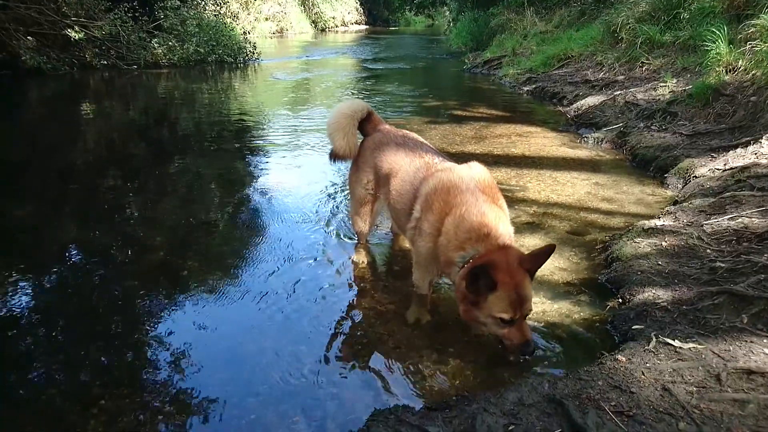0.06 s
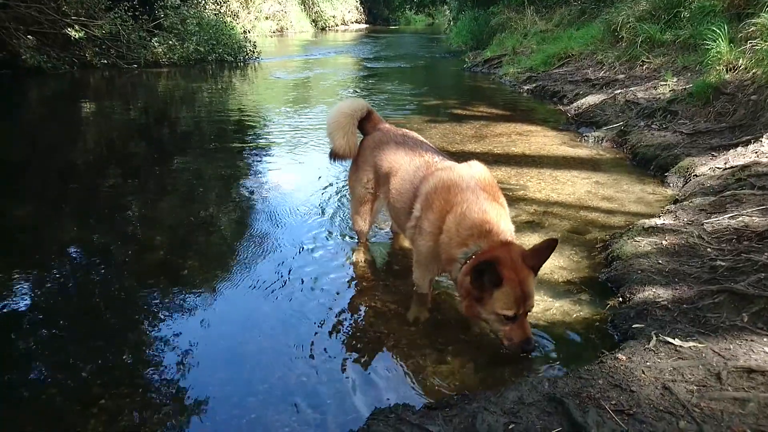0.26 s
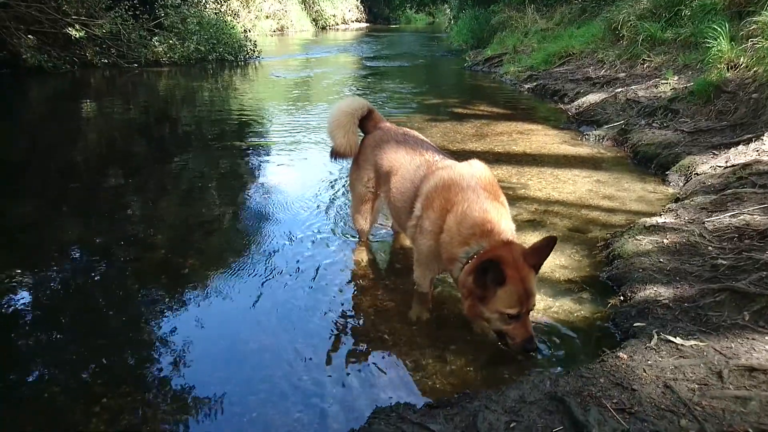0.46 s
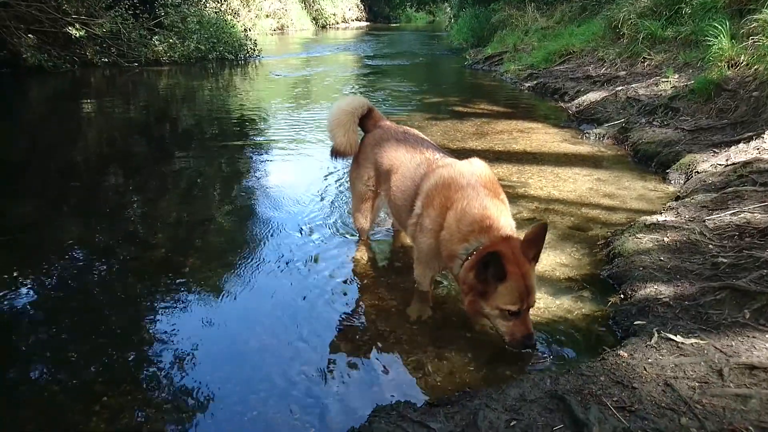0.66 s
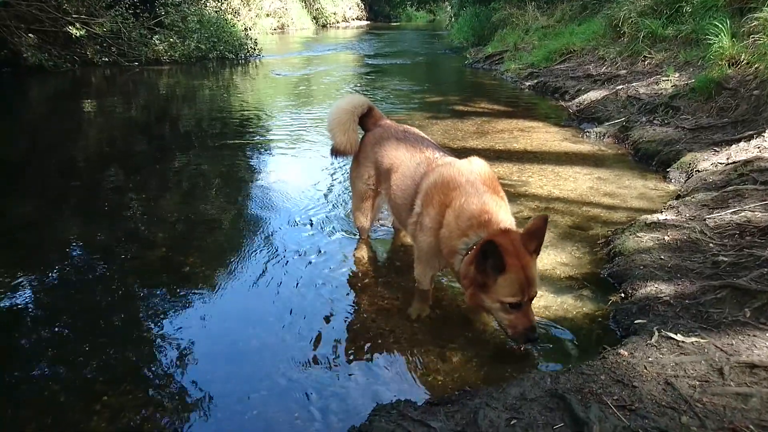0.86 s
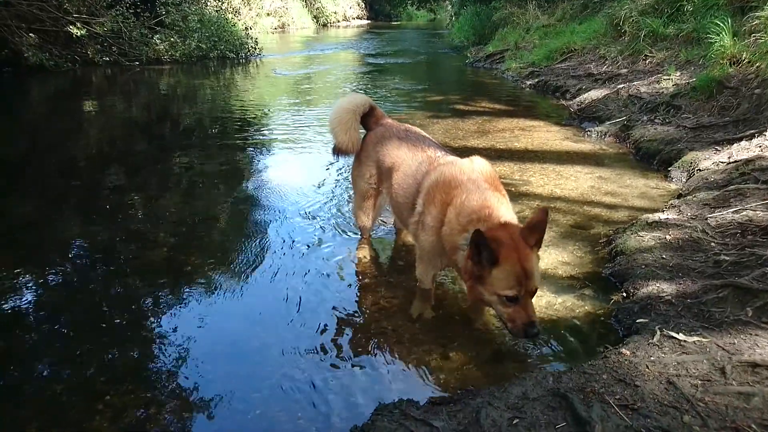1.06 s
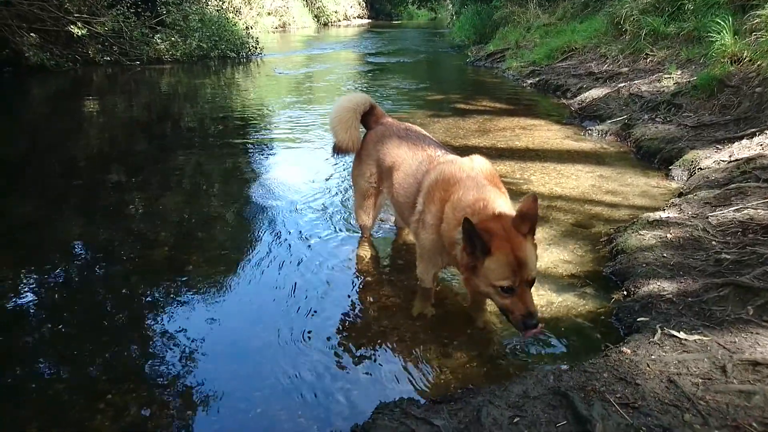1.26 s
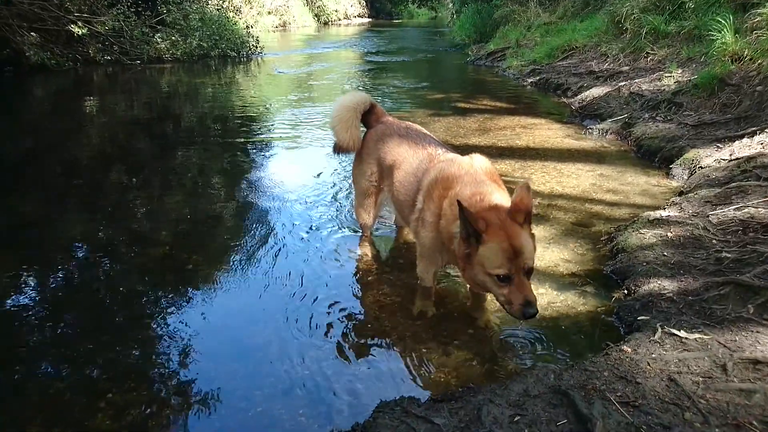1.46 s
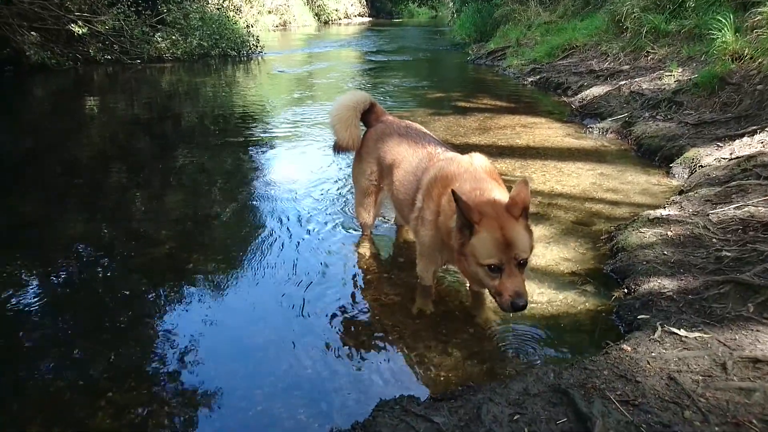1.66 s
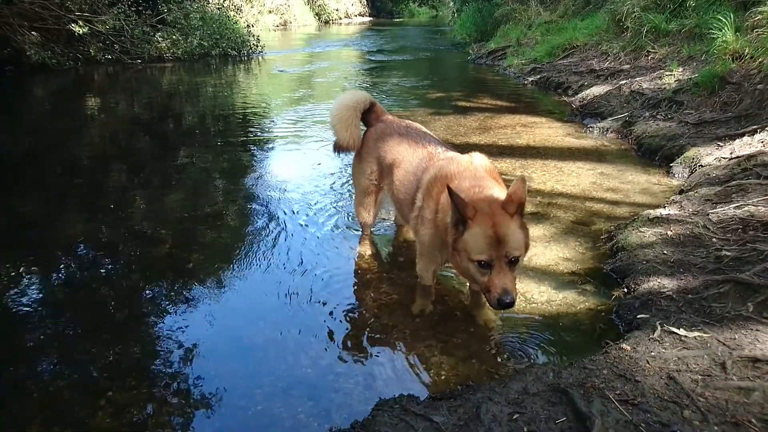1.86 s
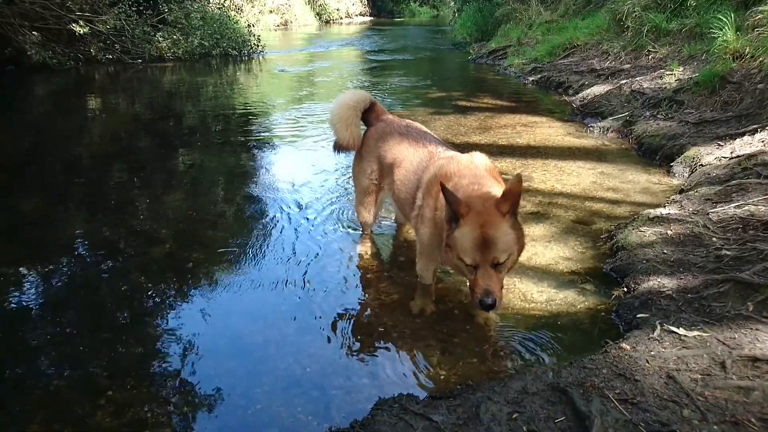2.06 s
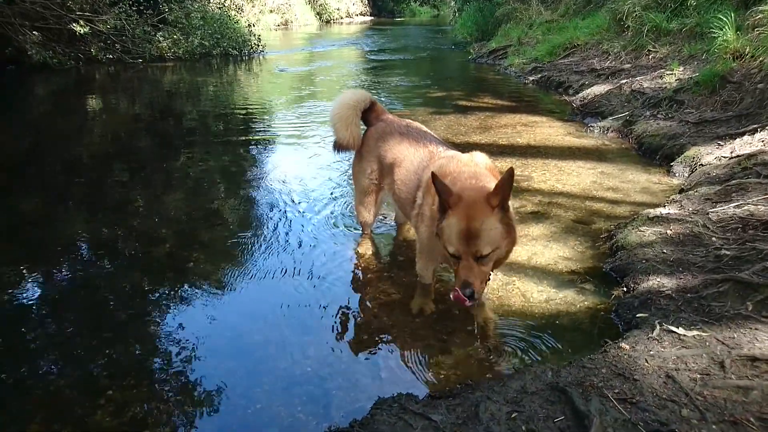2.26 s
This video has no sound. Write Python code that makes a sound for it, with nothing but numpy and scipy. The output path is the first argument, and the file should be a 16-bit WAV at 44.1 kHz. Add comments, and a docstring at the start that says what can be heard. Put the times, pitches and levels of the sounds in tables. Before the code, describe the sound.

A dog laps softly at a river on the left, with a few bubbles around 0.6 seconds, then small wet lip clicks until 2.4. Louder, low hand bumps hit the microphone on the right through 1.3 seconds and again at 2.1, with a faint sliding hiss early on. Light wind gusts near 1.1 and 1.9. From 0.3, a distant bird whistles on the left over faint water and leaves.

```python
"""A hand bumps and slides on the camera body while light wind buffets the right microphone port.
Off to the left a dog laps at a shallow river, then licks its lips: small wet clicks, a few bubbles.
Further left a songbird whistles from the trees, and the wooded banks echo it back.
Behind it all lies a faint wash of river and leaves."""
import sys
import numpy as np
from scipy import signal
from scipy.fft import rfft, irfft, next_fast_len
from scipy.io import wavfile
from scipy.ndimage import map_coordinates

SR = 44100
rng = np.random.default_rng(int(sys.argv[2]) if len(sys.argv) > 2 else 0)


def master_out(mix):
    """Clip the mix to full scale and print it as 16-bit PCM to the path in sys.argv[1]."""
    frames = np.transpose(np.atleast_2d(mix))
    ceiling = np.clip(frames, -1, 1)
    pcm = np.round(ceiling * 32767).astype(np.int16)
    wavfile.write(sys.argv[1], SR, pcm)


N = 105840
PORT_PAN_DB = -24  # wind and bumps land mostly on the right microphone


def dog():
    """The dog's mouth, to the left of the microphone, with a little echo off the banks."""
    clicks, bubbles = tongue_clicks(), tongue_bubbles()
    echo = amp(-19) * tree_echo(clicks + bubbles, pan_db=13)
    return panned(clicks, pan_db=35) + panned(bubbles, pan_db=14) + echo


def tongue_clicks():
    """Wet films snap on tongue and lips, each a brief ring with a little spatter."""
    # The snapping films. Each row: start in seconds, peak level in dB, pitch in Hz.
    snaps = [(0.5816, -38.5, 5760), (0.644, -51.5, 5250), (1.0049, -48, 5400), (1.1622, -52, 6450),
             (1.3794, -44, 5660), (1.653, -46, 6900), (1.7246, -48.5, 5500), (1.738, -44.5, 6300),
             (1.7525, -46, 6340), (1.8378, -46.5, 6080), (2.072, -49, 4260), (2.1284, -38, 6250),
             (2.3754, -47.5, 5040)]
    spatter_t60_s, half_band_octaves, bounce_s = 0.0063, 0.25, 0.0031
    clicks, t = np.zeros(N), np.arange(SR // 16) / SR
    for start, db, hz in snaps:
        spatter = amp(-16.5 - 60 * t / spatter_t60_s) * rng.standard_normal(len(t))
        snap = (t == 0) + spatter
        band_hz = hz * 2.0 ** np.array([-half_band_octaves, half_band_octaves])
        ring = signal.sosfilt(signal.butter(2, band_hz, "band", fs=SR, output="sos"), snap)
        click = ring + amp(-20) * snap
        click *= amp(db) / np.abs(click).max()
        add(clicks, start, click)
        add(clicks, start + bounce_s, amp(-6.5) * click)  # off the river surface
    return clicks


def tongue_bubbles():
    """Air trapped under the tongue rings, rising in pitch as it dies away."""
    # The bubbles. Each row: start in seconds, level in dB, starting pitch in Hz.
    bubbles = [(0.526, -51.5, 2170), (.557, -52.5, 1640), (0.57, -53.5, 1090), (0.643, -56, 850)]
    life_cycles, pitch_rise = 24, 0.22
    plops, t = np.zeros(N), np.arange(SR // 16) / SR
    attack = 1 - np.exp(-t / 0.00057)
    for start, db, hz in bubbles:
        age = t * hz / life_cycles
        ring = np.sin(2 * np.pi * hz * t * (1 + pitch_rise * age / 2))
        add(plops, start, amp(db - 60 * age) * attack * ring)
    return plops


def splash(centre_s=0.558, width_s=0.036, db=-66):
    """The fine spatter of one lap, left of centre."""
    swell = np.exp(-((np.arange(N) / SR - centre_s) / width_s) ** 2 / 2)
    hiss = noise([(300, -4), (900, -0.5), (2500, -7.5), (5000, 4), (8000, -11), (14000, -13)])
    spray = unit(hiss * amp(2.8 * wobble(330)))
    return panned(amp(db) * swell * spray, pan_db=11)


def hand_bumps():
    """Shifts of grip thump and tap the camera body, right at the microphone."""
    # The bumps. Each row: start in seconds, thump level in dB, pitch in Hz, tap strength in dB.
    bumps = [(0.055, -25, 62.9, -29.5), (0.099, -51, 84, -24), (0.223, -21, 88, -73), (.29, -23, 83, -67),
             (0.565, -16.5, 77.3, -44), (0.743, -21.5, 65.4, -24.5), (0.789, -19.5, 56.2, -69),
             (0.963, -21.5, 95, -58), (1.049, -18, 95.7, -54), (1.11, -16.5, 73, -32.5),
             (1.184, -24, 55, -48), (1.299, -25, 72, -74), (2.095, -22.5, 88.7, -24.5),
             (2.117, -25.5, 86.2, -37.5)]
    thump_t60_s, rise_s, tap_s, soften_hz = 0.13, 0.0041, 0.0022, 850
    thumps, taps, t = np.zeros(N), np.zeros(N), np.arange(SR // 4) / SR
    envelope = amp(-60 * t / thump_t60_s) * (1 - np.exp(-t / rise_s))
    age = t / tap_s
    tap = 2 * age * (2 - age) * np.exp(-age)
    for start, db, hz, tap_db in bumps:
        add(thumps, start, amp(db) * envelope * np.sin(2 * np.pi * hz * t))
        add(taps, start, amp(tap_db) * tap)
    soft_taps = filtered(taps, lambda hz: 1 / (1 + 1j * hz / soften_hz) ** 2)
    return panned(thumps + soft_taps, PORT_PAN_DB)


def hand_slide():
    """Skin hisses past the two microphone ports, each with its own resonance."""
    # The course of the slide. Each row: time in seconds, level in dB.
    slide_levels = [(0, -87), (.043, -75), (.056, -56), (.08, -60.5), (.135, -62), (.175, -59), (.205, -60),
                    (.24, -55), (.32, -51), (.41, -65.5), (.455, -59), (.53, -62), (.62, -73), (.71, -85),
                    (.77, -71), (.95, -113)]
    # The hiss at each port, then one brief, very high brush. Each row: frequency in Hz, relative dB.
    left_colour = [(750, -12.5), (1300, -28), (4800, -17), (5600, -5), (6500, 5.5), (7600, -3), (9000, -11),
                   (10500, -23), (15500, -20)]
    right_colour = [(750, -3), (1300, -29), (3800, -14), (4700, -7), (5700, 1.5), (7000, -6), (8200, -21.5),
                    (12500, -19), (15000, -8.5)]
    brush_colour = [(3000, -22), (6500, -5), (10000, -15), (12500, -6), (15000, -1.5)]
    brush_at_s, brush_width_s = 1.0, 0.046
    friction = amp(curve(slide_levels) + 1.37 * wobble(44.3))
    hiss = friction * np.array([noise(left_colour), amp(-3.5) * noise(right_colour)])
    brush = amp(-65) * np.exp(-((np.arange(N) / SR - brush_at_s) / brush_width_s) ** 2)
    return hiss + brush * stereo_noise(brush_colour)


def wind():
    """Wind rumbles on the right port; short gusts add a brighter, lumpy flutter."""
    # The breeze. Each row: time in seconds, relative level in dB.
    breeze_levels = [(0, -55.5), (.42, -49.5), (.64, -48), (.89, -48), (1.06, -50), (1.2, -42.5),
                     (1.26, -54.5), (1.58, -47.5), (1.7, -51.5), (1.8, -44.5), (1.95, -56), (2.03, -53),
                     (2.4, -54.5)]
    # The gusts. Each row: centre in seconds, half width in seconds, relative level in dB.
    gusts = [(0.969, 0.06, -48.5), (1.057, 0.034, -36), (1.118, 0.011, -29.5), (1.866, 0.046, -38.5),
             (1.956, 0.0052, -39), (2.119, 0.018, -34)]
    # Breeze and gusts as the port hears them. Each row: frequency in Hz, relative level in dB.
    rumble_colour = [(25, -27), (42, -6), (58, 1), (85, 0), (130, -5.5), (190, -22.5), (300, -30.5),
                     (700, -73.5)]
    gust_colour = [(40, -17), (75, 12), (125, 11.5), (240, 4.5), (400, -4), (550, -18.5), (1000, -31),
                   (2000, -44), (5000, -74)]
    roundness = 0.93  # 1 is a pointed gust, 2 a rounded one
    t = np.arange(N) / SR
    rumble = amp(curve(breeze_levels) + 10.5) * stereo_noise(rumble_colour)
    force = sum(amp(db) * np.exp(-np.abs((t - at) / width) ** roundness) for at, width, db in gusts)
    flutter = force * amp(4 + 0.9 * wobble(90)) * stereo_noise(gust_colour)
    return panned(rumble + flutter, PORT_PAN_DB)


def bird():
    """Unsteady whistled glides, some with a fast trill, from far left and smeared by the trees."""
    # The song. Each row: start and length in seconds, first, middle and last pitch in Hz,
    # level in dB, trill depth in Hz.
    notes = [(0.292, 0.026, 3970, 3750, 3670, -66, 10), (0.311, 0.021, 3500, 3170, 3150, -66.5, 0),
             (0.323, 0.055, 3250, 3290, 2860, -63, 34), (0.375, 0.031, 3030, 2923, 2700, -64, 78),
             (0.834, 0.036, 4340, 3950, 4020, -62.5, 145), (1.029, 0.034, 2680, 3270, 3110, -65, 0),
             (1.097, 0.021, 3730, 4274, 4160, -55.5, 17), (1.248, 0.018, 2590, 2870, 2940, -63.5, 0),
             (1.271, 0.015, 2850, 2980, 3070, -58.5, 0), (1.3, 0.018, 3100, 3210, 3080, -60.5, -4),
             (1.373, 0.052, 4450, 3790, 3830, -58, 68), (1.418, 0.0554, 3830, 3770, 4100, -57.5, 220),
             (1.569, 0.06, 2945, 3320, 3290, -62.5, 43), (1.614, 0.0464, 3156, 2830, 2753, -61, 57),
             (1.662, 0.039, 2663, 2743, 3080, -72.5, 64), (1.852, 0.039, 3730, 3750, 3720, -64, 10),
             (1.986, 0.053, 3333, 3266, 2590, -60, 5), (2.114, 0.06, 3500, 3473, 3600, -62, 178),
             (2.17, 0.091, 3635, 3790, 3715, -60.5, 220), (2.294, 0.0657, 2957, 2680, 2520, -62.5, 7)]
    trill_rate_hz, fade_s = 124.6, 0.0057
    warble_hz, flutter_db, wobbles_per_s = 32.8, 1.87, 195
    song = np.zeros(N)
    for start, length, first, middle, last, db, trill_depth in notes:
        t = np.arange(int(length * SR)) / SR
        glide = np.polyval(np.polyfit([0, .5, 1], [first, middle, last], 2), t / length)
        trill = trill_depth * np.sin(2 * np.pi * trill_rate_hz * t)
        hz = glide + trill + warble_hz * wobble(wobbles_per_s)[:len(t)]
        level = amp(db + flutter_db * wobble(wobbles_per_s)[:len(t)])
        fade = np.clip(np.minimum(t, length - t) / fade_s, 0, 1)
        add(song, start, level * fade * np.sin(2 * np.pi * np.cumsum(hz) / SR))
    return panned(song, pan_db=41) + amp(-1) * tree_echo(song, pan_db=41)


def tree_echo(x, pan_db, t60_s=0.38):
    """Diffuse echo from the wooded banks."""
    t = np.arange(SR // 2) / SR
    tail = rng.standard_normal((2, len(t))) * amp(-60 * t / t60_s) * (1 - np.exp(-t / 0.0022))
    echo = signal.fftconvolve(x[None], tail / np.linalg.norm(tail[0]), axes=1)
    return panned(echo[:, :N], pan_db)


def river_and_leaves():
    """A faint, steady wash from all around."""
    # Water and foliage together. Each row: frequency in Hz, relative level in dB.
    wash_colour = [(25, -34), (60, 15.5), (110, 21), (250, 5.5), (500, 0), (900, -12.5), (1500, -16.5),
                   (3000, -14), (5500, -12.5), (9000, -18.5), (15500, -19.5)]
    return amp(-58) * stereo_noise(wash_colour)


def amp(db):
    """Decibels to gain."""
    return 10 ** (np.asarray(db) / 20)


def unit(x):
    """Scale to rms 1."""
    return x / np.sqrt(np.mean(x ** 2) + 1e-20)


def curve(rows):
    """One value per sample from rows of seconds and value."""
    return np.interp(np.arange(N) / SR, *np.transpose(rows))


def wobble(rate):
    """A smooth random curve, rate knots a second."""
    return map_coordinates(rng.standard_normal(1024), [np.arange(N) * rate / SR], mode="wrap")


def filtered(x, response):
    """Filter x by a response given as a function of Hz."""
    size = next_fast_len(N + SR // 2)
    return irfft(rfft(x, size) * response(np.fft.rfftfreq(size, 1 / SR)), size)[..., :N]


def noise(colour):
    """Noise of rms 1, coloured by rows of Hz and dB."""
    knots_hz, db = np.transpose(colour)
    white = rng.standard_normal(N)
    return unit(filtered(white, lambda hz: amp(np.interp(np.log(hz + 1), np.log(knots_hz), db))))


def stereo_noise(colour):
    """Independent noise at each microphone."""
    return np.array([noise(colour), noise(colour)])


def add(track, start_s, sound):
    """Mix a sound into the track."""
    part = track[max(round(start_s * SR), 0):][:len(sound)]
    part += sound[:len(part)]


def panned(x, pan_db):
    """Stereo, with the far side lowered; positive is left."""
    return x * amp([[min(pan_db, 0)], [min(-pan_db, 0)]])


def scene():
    """The riverside as it reaches the camera's two microphones."""
    return dog() + splash() + bird() + hand_slide() + hand_bumps() + wind() + river_and_leaves()


def record(dry):
    """The camera cuts the deepest bass and everything above its band limit."""
    low_cut_hz, top_hz = 42, 15800
    lean = signal.sosfilt(signal.butter(2, 30, "high", fs=SR, output="sos"), dry)
    return filtered(lean, lambda hz: (hz < top_hz) * hz ** 4 / np.hypot(hz ** 4, low_cut_hz ** 4))


dry = scene()
out = record(dry)
master_out(out)
```